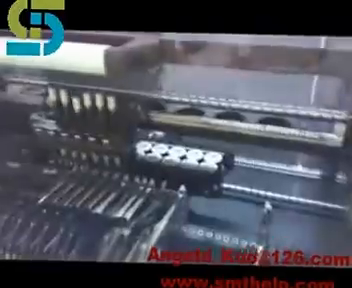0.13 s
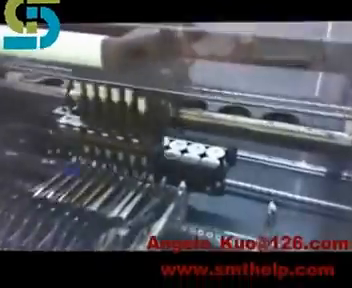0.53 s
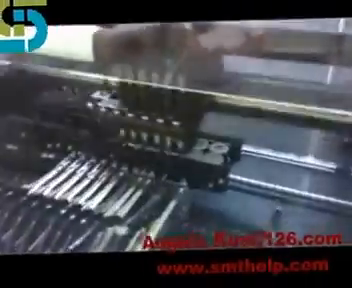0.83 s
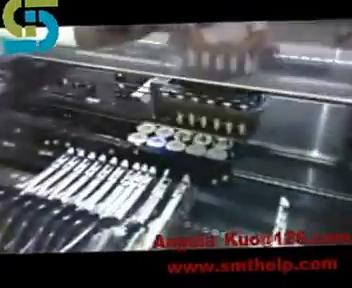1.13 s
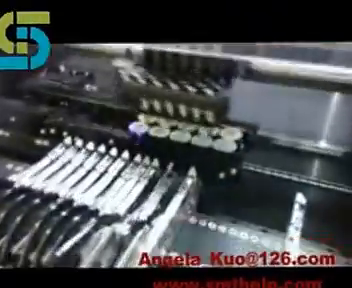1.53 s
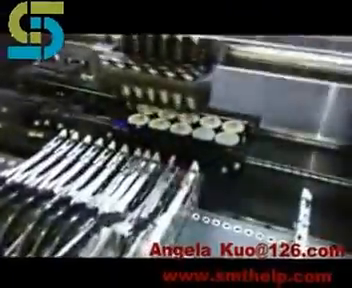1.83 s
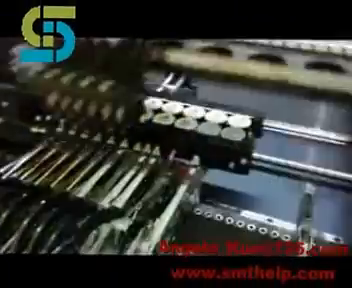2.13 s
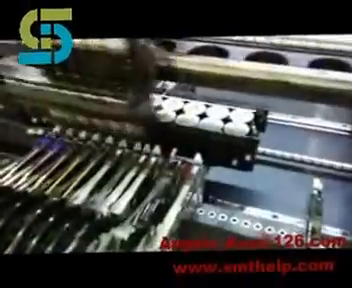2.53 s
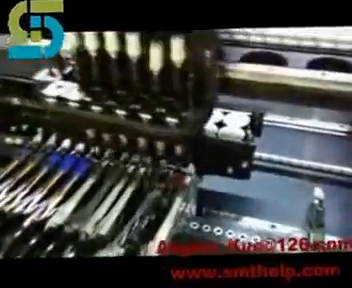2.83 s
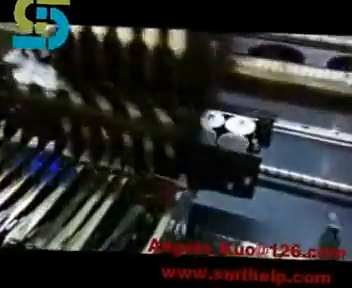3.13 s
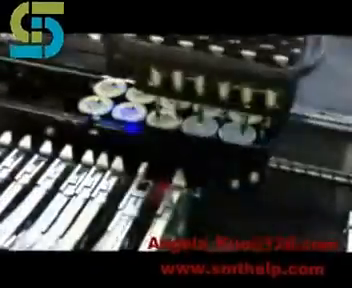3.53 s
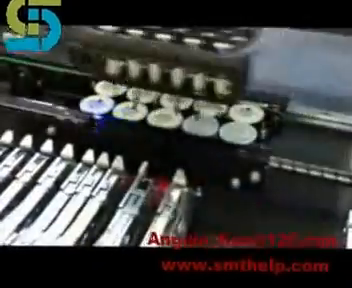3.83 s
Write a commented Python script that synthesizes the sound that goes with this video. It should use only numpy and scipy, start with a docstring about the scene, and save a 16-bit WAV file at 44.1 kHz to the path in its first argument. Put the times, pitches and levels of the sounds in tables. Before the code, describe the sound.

Automated assembly machine running close up, with hissing air, rattling moves and short valve spits.

```python
"""Gantry of a pick-and-place machine, heard close up inside its cabinet on a factory floor.
Each move rolls bearing balls along the rails, rumbles the frame and rattles the steel head;
servos whine under load. Air valves spit as the nozzles pick parts; one nozzle pings on metal.
The vacuum nozzles hiss over the steady pump and fans and the low rumble of the bed."""
import sys
import numpy as np
from scipy import signal
from scipy.fft import rfft, irfft
from scipy.io import wavfile
from scipy.ndimage import uniform_filter1d

SR = 44100
rng = np.random.default_rng(int(sys.argv[2]) if len(sys.argv) > 2 else 0)


def unload_audio(sound):
    """Save the sound as a 16-bit wav file, at the path given as the first command line argument."""
    columns = np.transpose(np.atleast_2d(sound))
    # keep every value between -1 and 1, then stretch to whole-number steps
    steps = np.round(np.clip(columns, -1, 1) * 32767)
    wavfile.write(sys.argv[1], SR, steps.astype(np.int16))


N = 176400
TIME_S = np.arange(N) / SR
FREQ_HZ = np.arange(N // 2 + 1) * SR / N

# nozzle hiss spectrum: freq_hz, gain_db
NOZZLE_SPECTRUM = [(1500, -21), (4000, -43.5), (6000, -15.5), (7350, -9.5), (7650, -9), (7900, -3),
                   (8250, 0), (8950, 1), (9500, -1), (10100, -10.5)]
NOZZLE_CORRELATION, FLICKER_DB = 0.065, 1.44
MOTOR_PAN_DB, GANTRY_PAN_DB = 4.5, 3


def undb(db):
    """Decibels to gain."""
    return 10 ** (np.asarray(db) / 20)


def unit(x):
    """Scale to rms 1."""
    return x / np.sqrt(np.mean(x ** 2))


def curve(points):
    """Gain along (time_s, level_db) points."""
    return undb(np.interp(TIME_S, *np.array(points).T))


def pan(x, db):
    """Left louder than right by db."""
    return x * unit(undb(np.array([[db], [-db]]) / 2))


def colour(x, spectrum):
    """Filter by (freq_hz, gain_db) points; rms 1."""
    hz, db = np.array(spectrum).T
    gain = undb(np.interp(np.log(FREQ_HZ + 1), np.log(hz), db))
    return unit(irfft(rfft(x) * gain, N))


def waver(rate_hz):
    """Smooth random drift; rms 1."""
    hold = int(SR / rate_hz)
    steps = np.repeat(rng.standard_normal(N // hold + 1), hold)
    return unit(uniform_filter1d(steps, hold)[:N])


def stereo(x, correlation):
    """Two independent signals to correlated left and right."""
    mid = np.sqrt(1 + correlation) * x[0]
    side = np.sqrt(1 - correlation) * x[1]
    return np.array([mid + side, mid - side]) / np.sqrt(2)


def noise(correlation):
    """Stereo white noise."""
    return stereo(rng.standard_normal((2, N)), correlation)


def reflections(t60_s):
    """Decaying stereo scatter; energy 1 per side."""
    return unit(noise(correlation=0) * undb(-60 * TIME_S / t60_s)) / np.sqrt(N)


def convolve(x, response):
    """Convolve each channel; N samples."""
    return signal.fftconvolve(np.atleast_2d(x), np.atleast_2d(response), axes=1)[:, :N]


def bed_rumble():
    """Low rumble of the machine bed."""
    # rumble spectrum: freq_hz, gain_db
    spectrum = [(20, -31), (32, -22), (43, 5.5), (62, 5.5), (85, -0.5), (130, -8.5), (200, -11.5),
                (500, -44.5)]
    # rumble envelope: time_s, level_db
    levels = [(.13, -41), (1.0, -38.5), (1.8, -38.5), (2.3, -36.5), (2.8, -37.5), (3.6, -36), (3.82, -31.5),
              (4.0, -35.5)]
    return pan(colour(noise(correlation=0.91), spectrum) * curve(levels), db=2)


def pump_and_fans():
    """Fan rush, wider towards the treble, plus wavering pump and fan hum."""
    # rush spectrum: freq_hz, gain_db
    spectrum = [(60, -10.5), (130, 0.5), (170, -3), (210, 1), (243, 1), (270, -3), (310, -4.5), (400, -4),
                (700, -9), (1100, -11.5), (2000, -12), (3000, -14), (4500, -11.5), (6500, -12),
                (8000, -12.5), (10000, -38.5)]
    # hum lines: pitch_hz, level_db
    lines = [(69.5, -45.5), (240, -48), (295, -44), (1696, -58.5)]
    correlation = 0.9 / (1 + (FREQ_HZ / 700) ** 2)
    air = irfft(stereo(rfft(rng.standard_normal((2, N))), correlation), N)
    rush = undb(-34 + FLICKER_DB * waver(25)) * colour(air, spectrum)
    hum = 0
    for pitch_hz, level_db in lines:
        gain = undb(level_db + 2 * waver(6.1))
        drifting_hz = pitch_hz * (1 + 0.00763 * waver(12))
        hum += gain * np.sin(2 * np.pi * np.cumsum(drifting_hz) / SR)
    return pan(rush + hum, MOTOR_PAN_DB)


def vacuum_hiss():
    """Air drawn through narrow nozzles; the hiss swings about as the head travels."""
    # hiss level and position: time_s, level_db, pan_db
    path = np.array([(.13, -41, 2), (.25, -39.5, 2), (.31, -35.5, 5), (.9, -34.5, 2.5), (1.5, -34, 2),
                     (1.62, -33.5, 3), (1.69, -29.5, 8), (1.79, -31, 10), (1.94, -28, 1), (1.97, -33.5, 4),
                     (2.14, -36, 8), (2.42, -39.5, 9), (2.5, -35.5, 10), (2.58, -31, 11), (2.7, -28, 6),
                     (2.81, -29, 7.5), (2.88, -27.5, 2.5), (2.96, -27.5, 8), (3.13, -28, 9),
                     (3.29, -25.5, 3), (3.41, -26, 14), (3.55, -28, 8.5), (3.84, -26.5, 3.5),
                     (4.0, -26, 7.5)])
    hiss = colour(noise(NOZZLE_CORRELATION), NOZZLE_SPECTRUM)
    level, left_ratio = curve(path[:, [0, 1]]), curve(path[:, [0, 2]])
    sides = np.array([left_ratio, np.ones(N)]) / np.sqrt((1 + left_ratio ** 2) / 2)
    return hiss * level * sides * undb(FLICKER_DB * waver(34.74))


def spectral_flicker(x):
    """Narrow random peaks and dips flicker through the sound, strongest in the treble."""
    # ripple depth: freq_hz, spread_db
    depths = [(500, 1.5), (2000, 2.1), (4000, 3), (7000, 4.2), (9000, 1.7)]
    width_hz, drift_s = 130, 0.13
    bins_hz, frames_s, spectra = signal.stft(x, SR, nperseg=1024)
    ripple = rng.standard_normal(spectra.shape[1:])
    ripple = uniform_filter1d(ripple, round(width_hz / bins_hz[1]), axis=0)
    ripple = uniform_filter1d(ripple, round(drift_s / frames_s[1]), axis=1)
    spread_db = np.interp(bins_hz, *np.array(depths).T)[:, None]
    gain = undb(unit(ripple).clip(None, 2) * spread_db)
    return signal.istft(spectra * gain, SR, nperseg=1024)[1][:, :N]


def head_ring(x):
    """Input plus the ringing it excites in the steel head."""
    # head resonances: freq_hz, t60_s, relative_db
    modes = [(2420, .03, -14), (4018, .10, -11), (5055, .05, -9), (5700, .04, -15), (6378, .06, -12),
             (6750, .04, -13), (7063, .12, -10), (8200, .05, -12)]
    response = 0
    for freq_hz, t60_s, relative_db in modes:
        decay_per_s = np.log(1000) / t60_s
        mode = np.cos(2 * np.pi * freq_hz * TIME_S) * np.exp(-decay_per_s * TIME_S)
        response += undb(9 + relative_db) * mode * 2 * decay_per_s / SR
    return x + convolve(x, response)


def air_valves():
    """Each valve vents a short sputtering jet that rings the head and hisses at its nozzle."""
    # valve openings: start_s, jet_db, hold_s, hiss_db, peak_hz, pan_db
    puffs = [(0.167, -31, 0.01, -53, 5200, 6), (0.28, -26, 0.0044, -49, 7260, 8),
             (0.385, -29.5, .003, -47, 5000, 4), (0.494, -28, 0.0048, -39, 4430, 11),
             (0.597, -36, .005, -37, 4970, 4.5), (0.807, -33, 0.018, -50, 4200, 2),
             (0.852, -31.5, .006, -34, 4400, 1), (.875, -38, 0.0098, -42, 4430, -3),
             (1.086, -35, 0.026, -35, 4600, -3), (1.758, -44.5, .0054, -29, 8000, 11),
             (2.169, -20.5, .005, -31, 7100, -1), (2.184, -21, 0.011, -29, 7500, 2),
             (2.598, -30.5, .025, -31, 6400, -1.5), (2.704, -29, 0.01, -34, 5900, -3),
             (2.731, -30.5, 0.0074, -41, 5800, -2), (2.961, -27, .005, -30, 6800, 4),
             (3.148, -27.5, 0.022, -38, 5640, 3), (3.26, -28.5, 0.007, -36, 6400, -2),
             (3.314, -23.5, .004, -30, 7400, 2.5), (3.589, -32, 0.041, -32, 4600, -1)]
    # jet spectrum: freq_hz, gain_db
    spectrum = [(400, -28), (1500, -7.5), (2400, 5), (3100, 1.5), (3900, 10.5), (5200, 9), (7200, 7.5),
                (8500, 11.5), (10000, -7.5)]
    rise_s, fall_s, peak_db, half_width_hz = 0.005, 0.009, 5, 510
    air_bins = rfft(colour(noise(correlation=0.29), spectrum))
    sputter = unit(undb(0.5 * waver(700)))
    jets = hiss_gain = 0
    for start_s, jet_db, hold_s, hiss_db, peak_hz, pan_db in puffs:
        before_s = np.maximum(start_s - TIME_S, 0)
        after_s = np.maximum(TIME_S - start_s - hold_s, 0)
        opening = pan(np.exp(-before_s / rise_s - after_s / fall_s), pan_db)
        peak = undb(peak_db / (1 + ((FREQ_HZ - peak_hz) / half_width_hz) ** 2))
        jets += undb(jet_db) * opening * unit(irfft(air_bins * peak, N))
        hiss_gain += undb(hiss_db) * opening
    hiss = hiss_gain * colour(noise(NOZZLE_CORRELATION), NOZZLE_SPECTRUM)
    return head_ring(jets * sputter) + hiss


def clicks(rate_hz, spread_db):
    """Random tiny impacts of uneven size."""
    impulses = (rng.random(N) < rate_hz / SR) * rng.choice([-1, 1], N)
    return impulses * undb(spread_db * rng.standard_normal(N).clip(-2, 2))


def clatter(rate_hz, spread_db, correlation):
    """Impacts all around, smeared by the covers without colouring."""
    impacts = np.array([clicks(rate_hz, spread_db) for _ in range(2)])
    scatter = rfft(reflections(t60_s=0.035))
    smeared = irfft(rfft(impacts) * scatter / np.abs(scatter), N)
    return stereo(smeared, correlation)


def gantry():
    """Bearing balls click on the rails, the frame rumbles, the head rattles; all swell with speed."""
    # gantry moves: fastest_s, rise_s, fall_s, rail_db, frame_db, rattle_db
    moves = [(.66, 0.17, 0.14, -38.5, -49, -58), (0.856, 0.027, 0.085, -31, -39, -40.5),
             (.972, 0.035, 0.038, -30.5, -29.5, -39), (1.16, 0.067, 0.098, -35, -36.5, -37),
             (1.239, 0.058, 0.073, -32.5, -38.5, -46), (1.39, 0.064, 0.089, -35, -41, -49),
             (1.545, 0.04, 0.056, -33, -41, -37.5), (1.70, 0.024, 0.052, -37, -44, -43),
             (1.89, 0.023, .04, -40, -40.5, -44), (2.042, 0.015, 0.039, -32, -56, -26.5),
             (2.13, 0.04, 0.027, -32, -36, -47), (2.255, 0.053, 0.058, -32, -36, -27.5),
             (2.306, 0.028, 0.049, -26.5, -27.5, -25), (2.47, 0.19, 0.21, -39, -36.5, -38.5),
             (2.769, 0.1, 0.16, -36.5, -40.5, -44), (3.10, 0.42, 0.16, -39.5, -40, -40),
             (3.309, 0.073, 0.082, -30.5, -39.5, -29.5), (3.386, 0.012, 0.063, -23.5, -30, -29.5),
             (3.649, 0.11, 0.099, -32.5, -35, -38), (3.85, 0.11, 0.17, -37.5, -41, -43)]
    # rail, frame and head rattle spectra: freq_hz, gain_db
    rail_spectrum = [(150, -16), (400, -20), (750, 1), (1100, 1.5), (1700, 4.5), (2300, 1.5), (2900, -2),
                     (3800, -1), (6000, -33.5), (10000, -52)]
    frame_spectrum = [(60, -7), (130, -4.5), (280, 1), (400, -8), (455, -2), (492, 6.5), (550, -3),
                      (700, -2.5), (1000, -15.5), (2500, -33.5)]
    rattle_spectrum = [(500, -26), (2000, -18), (3000, -38), (4000, 6.5), (5500, 6), (7200, 7), (8500, 8),
                       (10000, -7.5)]
    power = np.zeros((3, N))
    for fastest_s, rise_s, fall_s, rail_db, frame_db, rattle_db in moves:
        ramp_s = np.where(TIME_S < fastest_s, rise_s, fall_s)
        speed = np.exp(-np.abs((TIME_S - fastest_s) / ramp_s) ** 1.54)
        power += (undb([[rail_db], [frame_db], [rattle_db]]) * speed) ** 2
    rail_gain, frame_gain, rattle_gain = np.sqrt(power)
    balls = clatter(rate_hz=2500, spread_db=4, correlation=0.2)
    rails = rail_gain * colour(balls, rail_spectrum)
    frame = frame_gain * colour(noise(correlation=0.64), frame_spectrum)
    knocks = clatter(rate_hz=1100, spread_db=-0.5, correlation=0.82)
    rattle = rattle_gain * colour(head_ring(knocks), rattle_spectrum)
    return pan(rails + frame, GANTRY_PAN_DB) + pan(rattle, db=-0.5)


def nozzle_ping(start_s, level_db):
    """A nozzle taps metal and rings briefly."""
    # tap resonances: freq_hz, t60_s, relative_db
    modes = [(4870, 0.039, -1), (6670, .03, -3)]
    age_s = np.maximum(TIME_S - start_s, 0)
    ring = 0
    for freq_hz, t60_s, relative_db in modes:
        envelope = undb(level_db + relative_db - 60 * age_s / t60_s)
        ring += envelope * np.sin(2 * np.pi * freq_hz * age_s)
    return pan(ring, GANTRY_PAN_DB)


def servos():
    """Loaded motors swell to a held note with a faint octave, then glide as they fade."""
    # servo whines: start_s, length_s, first_hz, last_hz, level_db
    whines = [(0.937, 0.067, 485, 510, -38), (2.081, .097, 469, 458, -35), (2.069, 0.13, 505, 508, -36),
              (3.043, .23, 242, 209, -31.5), (3.587, 0.18, 243.4, 236, -34), (3.86, 0.13, 255, 245, -38.5)]
    drift, roughness = 1 + 0.0053 * waver(60), undb(0.5 * waver(40))
    motors = 0
    for start_s, length_s, first_hz, last_hz, level_db in whines:
        progress = np.clip((TIME_S - start_s) / length_s, 0, 1)
        pitch_hz = (first_hz + (last_hz - first_hz) * progress ** 3) * drift
        phase = 2 * np.pi * np.cumsum(pitch_hz) / SR
        swell = np.sqrt(np.abs(np.sin(np.pi * progress ** 0.6)))
        motors += undb(level_db) * swell * (np.sin(phase) + undb(-16) * np.sin(2 * phase))
    return pan(motors * roughness, MOTOR_PAN_DB)


def scene():
    """Gantry, valves and ping echo in the hall; all but bed and servos flicker."""
    moving = gantry() + air_valves() + nozzle_ping(start_s=0.602, level_db=-25)
    hall = undb(-6.5) * convolve(moving, reflections(t60_s=0.35))
    flickering = spectral_flicker(moving + hall + vacuum_hiss() + pump_and_fans())
    return flickering + bed_rumble() + servos()


def record(dry):
    """Abrupt fade-in after a short silence; steep low-pass."""
    start_s, fade_s, cutoff_hz = 0.128, 0.002, 10280
    gate = np.clip((TIME_S - start_s) / fade_s, 0, 1)
    lowpass = signal.ellip(12, 0.2, 80, cutoff_hz, fs=SR, output="sos")
    return signal.sosfilt(lowpass, dry * gate)


dry = scene()
out = record(dry)
unload_audio(out)
```